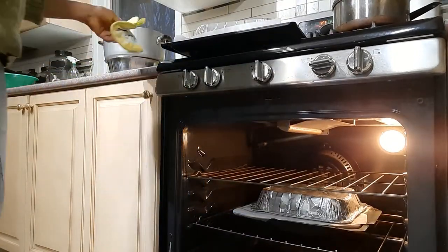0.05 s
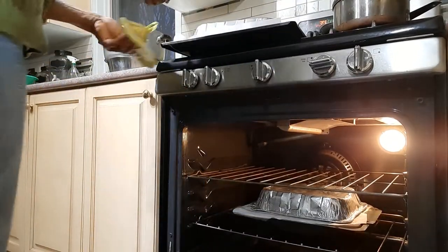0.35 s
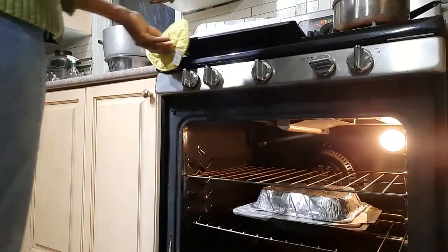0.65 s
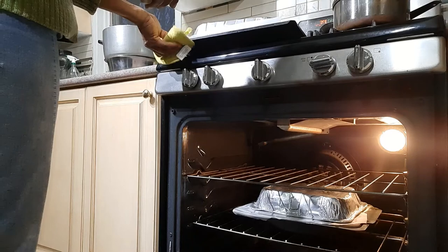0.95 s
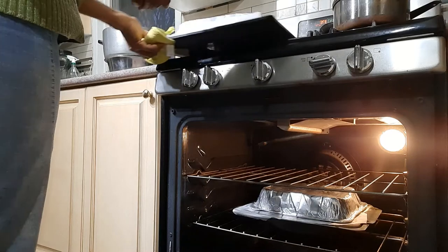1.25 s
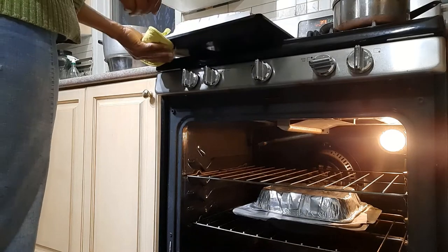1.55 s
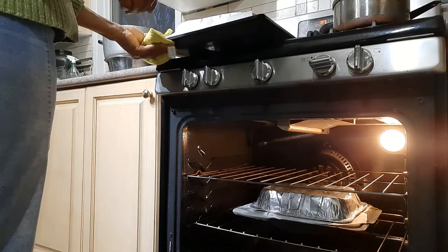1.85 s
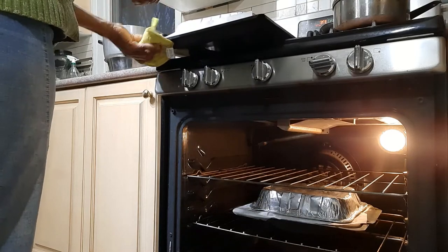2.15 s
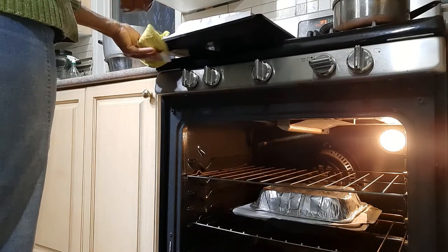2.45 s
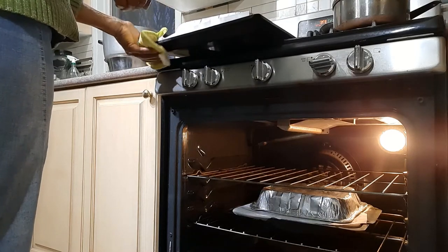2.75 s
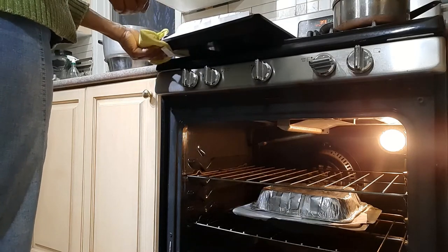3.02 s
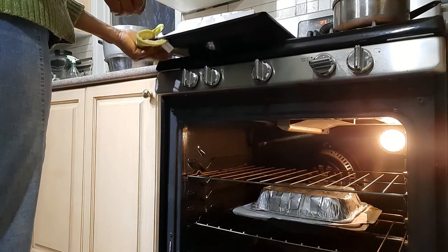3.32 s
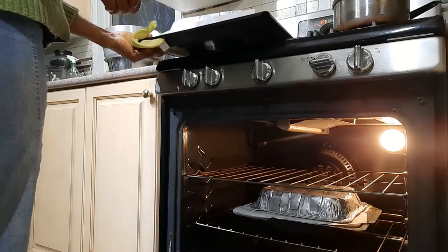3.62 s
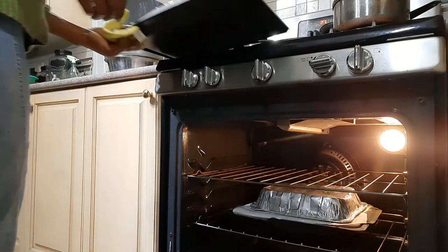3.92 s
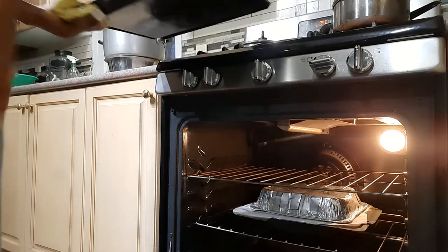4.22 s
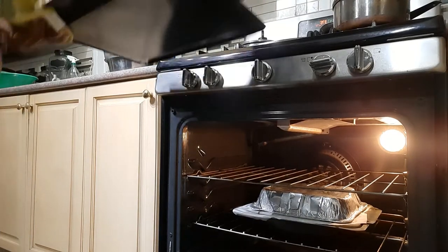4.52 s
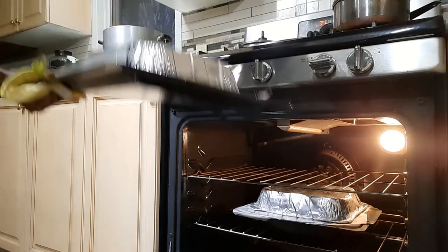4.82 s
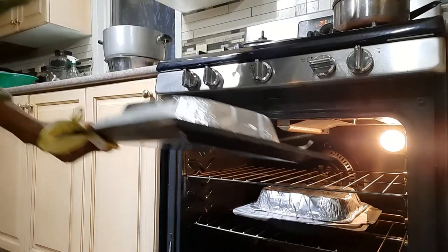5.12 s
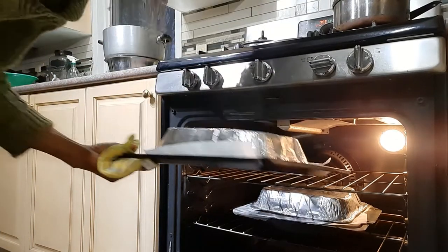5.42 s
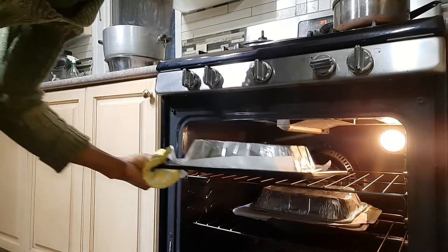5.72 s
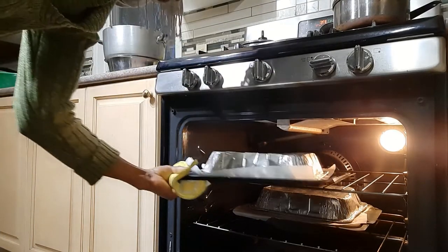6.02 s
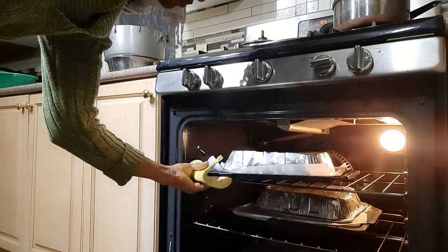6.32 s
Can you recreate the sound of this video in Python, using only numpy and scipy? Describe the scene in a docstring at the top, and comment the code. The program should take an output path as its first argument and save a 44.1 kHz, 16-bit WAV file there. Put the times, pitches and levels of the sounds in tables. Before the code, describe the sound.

A metal baking tray scrapes and clatters onto a wire oven rack near the end, ringing in short jerks while the oven's steel body booms. Everything before is much quieter: swishing clothes, a short drag across the stove top, a few sharp foil crinkles and light metallic taps as the tray is lifted. The sounds are nearby, in stereo, with the short echo of a small kitchen over a low steady hum.

```python
"""A baking tray lands on a wire oven rack, grinds inward by stick-slip and knocks home, steel ringing.
The juddering rack makes the oven's steel box boom. Before that, a hand in a cloth mitt drags the tray
across the stove top and lifts it off, its foil pan crinkling. Clothes rustle as the cook shifts and
bends in a small, hard kitchen, over a low steady hum."""
import sys
import numpy as np
from scipy import signal
from scipy.fft import rfft, irfft, next_fast_len
from scipy.io import wavfile
from scipy.ndimage import uniform_filter1d

SR = 44100
rng = np.random.default_rng(int(sys.argv[2]) if len(sys.argv) > 2 else 0)


def file_out(sig):
    """Save sig as 16-bit WAV at sys.argv[1]."""
    # one column per channel
    cols = np.atleast_2d(sig).T
    # limit, then scale
    lim = np.clip(cols, -1, 1)
    pcm = np.round(lim * 32767).astype(np.int16)
    wavfile.write(sys.argv[1], SR, pcm)


N = 289869

# tray slides along the rack wires: start_s, hold_s, friction_db, boom_db
RACK_SLIDES = [(5.836, 0.0069, -22.5, -29), (5.877, 0.027, -29.5, -38), (5.897, 0.051, -20.5, -29),
               (5.984, 0.027, -28, -43), (6.051, 0.038, -38, -36.5), (6.126, 0.057, -43.5, -39),
               (6.164, 0.026, -36.5, -38), (6.197, 0.059, -42, -34), (6.297, 0.0053, -50, -27),
               (6.39, 0.022, -42.5, -44.5), (6.463, 0.034, -60, -47.5)]
# source placement: freq_hz, left_minus_right_db
OVEN_PAN = [(200, 0), (400, -1), (700, 6.5), (1300, 0), (2400, 2), (4400, -2), (8000, -6), (13000, -5)]
STOVE_PAN = [(200, 4.5), (380, -3.5), (700, 6), (1300, 1.5), (4400, 0.5), (8000, -7), (15000, -5.5)]
COOK_PAN = [(380, 1), (700, 3), (1300, 2.5), (4400, 2), (8000, -4), (15000, -3.5)]


def amp(db):
    return 10 ** (np.asarray(db) / 20)


def unit(x):
    """x at rms 1."""
    return x / np.sqrt(np.mean(x ** 2) + 1e-20)


def along(points, hz):
    """(freq_hz, value) points read on a log axis."""
    freq_hz, values = np.transpose(points)
    return np.interp(np.log(hz + 1), np.log(freq_hz + 1), values)


def filtered(x, response):
    """x with its spectrum scaled by response(hz)."""
    n = x.shape[-1]
    n_fft = next_fast_len(n + 8192)
    return irfft(rfft(x, n_fft) * response(np.fft.rfftfreq(n_fft, 1 / SR)), n_fft)[..., :n]


def noise(colour, pan, size, tilt_db_oct=0):
    """Coloured stereo noise of rms 1, channels alike in the bass only."""
    # left-right likeness: freq_hz, correlation
    coherence = [(60, .96), (140, .97), (300, .8), (640, .35), (1400, .13), (6000, 0)]

    def mid_side_gains(hz):
        angle = np.arccos(np.clip(along(coherence, hz), -1, 1)) / 2
        gain = amp(along(colour, hz) + tilt_db_oct * np.log2(np.maximum(hz, 200)))
        return gain * [np.cos(angle), np.sin(angle)]

    mid, side = filtered(rng.standard_normal((2, size)), mid_side_gains)
    stereo = np.array([mid + side, mid - side])
    return unit(filtered(stereo, lambda hz: amp(np.outer([.5, -.5], along(pan, hz)))))


def burst(colour, pan, tilt_db_oct=0, direct=0.096, direct_s=0.0083):
    """One contact in the room: a crack, then reflections whose treble dies first."""
    # kitchen reverberation: freq_hz, t60_s
    room_decay = [(150, 0.7), (700, 0.45), (2000, 0.29), (5000, 0.25), (14000, 0.28)]
    size = SR // 2
    hz, frame_s, spectra = signal.stft(noise(colour, pan, size, tilt_db_oct), SR, nperseg=256)
    decay = amp(-60 * frame_s / along(room_decay, hz)[:, None])
    tail = signal.istft(spectra * decay, SR, nperseg=256)[1][:, :size]
    return tail * (1 + direct * np.exp(-np.arange(size) / SR / direct_s))


def clang(modes, colour, pan, tilt_db_oct, ring_db, rise_s=0.00059):
    """Metal contact: modes ring at random strengths over a dense burst."""
    t = np.arange(SR // 2) / SR
    hz, level_db, t60_s = np.transpose(modes)[:, :, None]
    strength = amp(level_db + 2 * rng.standard_normal(hz.shape))
    phase = rng.uniform(0, 2 * np.pi, (2, len(modes), 1))
    balance = amp(np.array([.5, -.5])[:, None, None] * along(pan, hz))
    partials = balance * strength * amp(-60 * t / t60_s) * np.sin(2 * np.pi * hz * t + phase)
    ring = partials.sum(axis=1) / np.linalg.norm(strength)
    attack = 1 - np.exp(-(t / (rise_s * 2 ** (-tilt_db_oct / 2))) ** 2)  # dull contacts are slow
    ring_gain = amp(ring_db - 2 * abs(tilt_db_oct))  # glancing or soft contacts hardly ring
    return attack * (burst(colour, pan, tilt_db_oct) + ring_gain * ring)


def slips(rate_hz, spread_db):
    """Random stick-slip impulses of uneven size, rms 1."""
    impulses = (rng.random(N) < rate_hz / SR) * rng.choice([-1, 1], N)
    return unit(impulses * amp(spread_db * np.clip(rng.standard_normal(N), -2, 2)))


def excite(drive, response):
    """Drive convolved with a stereo response scaled to unit energy."""
    return signal.fftconvolve(drive[None], unit(response) / np.sqrt(response.shape[1]), axes=1)[:, :N]


def friction(colour, pan, rate_hz, spread_db, linger_s=0.0075, body_db=-1):
    """Grainy rubbing, rms 1: each slip puffs noise and excites nearby resonances."""
    t = np.arange(SR // 8) / SR
    drive = slips(rate_hz, spread_db)
    energy = signal.fftconvolve(drive ** 2, 4 * np.exp(-t / .001) + np.exp(-t / linger_s))[:N]
    puffs = unit(np.sqrt(np.abs(energy)) * noise(colour, pan, N))
    return unit(puffs + amp(body_db) * excite(drive, burst(colour, pan, direct=0)))


def strikes(rows, sound):
    """A fresh sound(tilt_db_oct) for each row."""
    track = np.zeros((2, N + SR))
    for start_s, level_db, tilt_db_oct in rows:
        track[:, round(start_s * SR):][:, :SR // 2] += amp(level_db) * sound(tilt_db_oct)
    return track[:, :N]


def swell(start, hold_s, attack_s, release_s, bend):
    """Gain: 1 from start (s) for hold_s, -20 dB attack_s before and release_s after; bend curves it."""
    first = max(0, int((start - 4 * attack_s) * SR))
    last = min(N, int((start + hold_s + 4 * release_s) * SR))
    t = np.arange(first, last) / SR - start
    away = np.maximum(-t / attack_s, 0) + np.maximum((t - hold_s) / release_s, 0)
    gain = np.zeros(N)
    gain[first:last] = amp(-20 * away ** bend)
    return gain


def swells(starts_s, holds_s, levels_db, attack_s, release_s, bend):
    """Swells of one shape, added in power."""
    return np.sqrt(sum((amp(level_db) * swell(start_s, hold_s, attack_s, release_s, bend)) ** 2
                       for start_s, hold_s, level_db in zip(starts_s, holds_s, levels_db)))


def room_tone(hollow_db=-75, hum_db=-73, hiss_db=-77):
    """Low hum, faint hiss and a hollow noise that swells as the cook shifts about."""
    # cook's shuffles: start_s, hold_s, level_db
    shuffles = [(0, 0.11, -59.5), (0.182, .13, -65.5), (0.534, 0.11, -66.5), (0.794, 0.07, -66),
                (1.87, 0.19, -71), (2.613, 0.056, -66.5), (2.781, 0.045, -62.5), (2.933, 0.21, -70),
                (3.51, 0.36, -68.5), (3.985, 0.33, -71.5), (4.484, 0.026, -60), (5.127, 0.028, -68),
                (5.538, 0.051, -66), (5.716, .1, -74)]
    # spectra: freq_hz, level_db
    hollow_colour = [(40, -25), (130, -13.5), (225, -17.5), (285, -9), (320, 1), (365, -9), (470, -17),
                     (780, -17), (1100, -25.5), (2500, -42), (5000, -72)]
    hum_colour = [(25, -31), (50, -6.5), (78, 2.5), (135, -2.5), (185, -2), (230, -11), (320, -19),
                  (470, -7.5), (750, -15), (1200, -22.5), (3000, -67)]
    hiss_colour = [(60, -15), (300, 1.5), (1000, -5.5), (2500, -4.5), (15000, -4)]
    centre = [(1000, 0)]
    shifts = swells(*np.transpose(shuffles), attack_s=.09, release_s=0.23, bend=0.83)
    hollow = np.hypot(amp(hollow_db), shifts) * noise(hollow_colour, centre, N)
    hiss = amp(hiss_db) * noise(hiss_colour, centre, N)
    return amp(hum_db) * noise(hum_colour, centre, N) + hollow + hiss


def cloth():
    """Mitt and clothes: fibres hiss, the pressed weave rubs lower."""
    # cloth strokes: start_s, hold_s, swish_db, rub_db
    strokes = [(.01, 0.038, -65, -64.5), (0.12, .08, -78, -92), (0.287, 0.051, -67, -66.5),
               (0.417, 0.21, -76, -71.5), (0.665, .05, -61, -61.5), (0.776, 0.022, -58.5, -58),
               (0.883, 0.059, -60, -62.5), (1.515, 0.06, -63, -72.5), (1.645, 0.031, -63.5, -64.5),
               (1.746, 0.04, -52.5, -60.5), (1.852, 0.25, -72, -71.5), (2.12, 0.17, -74.5, -78),
               (2.352, 0.11, -68, -76.5), (2.471, .015, -64, -68.5), (2.641, 0.027, -61.5, -68.5),
               (2.7, 0.068, -67, -69.5), (2.89, 0.19, -67, -75), (3.144, 0.093, -63.5, -66),
               (3.61, 0.025, -66, -67), (4.039, 0.082, -68.5, -73), (4.24, 0.095, -61.5, -72.5),
               (4.448, 0.23, -57.5, -71), (4.708, 0.18, -55.5, -67.5), (5.0, 0.23, -78.5, -82),
               (5.554, 0.057, -98, -84.5), (6.423, 0.049, -48.5, -65.5)]
    # spectra: freq_hz, level_db
    swish_colour = [(200, -50), (1200, -15), (3000, 1), (4500, 2), (7000, 1), (9000, -2.5), (12500, 1),
                    (15500, -0.5)]
    rub_colour = [(40, -45), (200, -54), (450, -0.5), (800, 6), (1150, 2), (2200, 0), (4000, -13),
                  (9000, -58)]
    start_s, hold_s, swish_db, rub_db = np.transpose(strokes)
    swish = swells(start_s, hold_s, swish_db, attack_s=0.13, release_s=0.12, bend=0.9)
    rub = swells(start_s, hold_s, rub_db, attack_s=0.14, release_s=0.22, bend=0.75)
    fibres = swish * friction(swish_colour, COOK_PAN, rate_hz=4000, spread_db=3.0)
    weave = rub * friction(rub_colour, COOK_PAN, rate_hz=230, spread_db=1)
    return fibres + weave


def foil_pan(gain_db=-1):
    """The foil pan crinkles in sharp cracks."""
    # crinkles: start_s, level_db, tilt_db_oct
    crinkles = [(1.467, -60, -4), (1.635, -51, 11), (1.647, -53, 12), (1.749, -50, -1), (1.916, -58.5, -3),
                (2.006, -42.5, 8.5), (2.014, -46, -2), (2.336, -64.5, 9), (4.328, -50.5, 12)]
    # foil spectrum: freq_hz, level_db
    colour = [(60, -50), (200, -46), (450, -11), (800, -4.5), (1700, -15), (3100, 0.5), (6200, -2.5),
              (8500, -7), (11800, -4), (15500, -12)]
    crack = lambda tilt: burst(colour, COOK_PAN, tilt, direct=0.2, direct_s=0.00047)
    return amp(gain_db) * strikes(crinkles, crack)


def stove_bumps(rise_s=0.0019):
    """Padded bumps on the stove body: force builds slowly, so nothing cracks or rings."""
    # bumps: start_s, level_db, tilt_db_oct
    bumps = [(3.379, -53, 8.5), (3.412, -59.5, 1), (3.545, -62.5, -6), (3.8, -74, 8)]
    # thud spectrum: freq_hz, level_db
    colour = [(35, -26), (100, 9), (300, 11), (480, 7), (750, 2), (1200, -6), (2200, -17.5), (3200, -38.5),
              (6000, -46), (12000, -65)]
    t = np.arange(SR // 2) / SR
    attack = 1 - np.exp(-(t / rise_s) ** 2)
    return strikes(bumps, lambda tilt: attack * burst(colour, STOVE_PAN, tilt))


def tray_on_stove(drag_db=-44, tap_gain_db=-1):
    """The tray drags over the stove top, taps it and slides ringing off its edge."""
    # one pull, speeding up then slowing: start (s), hold_s, attack_s, release_s, bend
    pull = dict(start=1.163, hold_s=0.049, attack_s=0.095, release_s=0.22, bend=1.98)
    # pulls off the edge: start_s, hold_s, level_db
    edge_pulls = [(3.655, .06, -55), (3.8, .015, -49)]
    # light taps: start_s, level_db, tilt_db_oct
    tap_hits = [(.868, -69, 9), (1.116, -69, -17), (1.222, -64, -14), (3.192, -73, 4), (3.53, -58.5, -5),
                (3.671, -53.5, -2), (3.728, -48.5, -3.5), (3.764, -47.5, 0), (3.805, -50, 2.5)]
    # rim ringing on the stove: pitch_hz, level_db, t60_s
    rim_modes = [(791, 11, 0.2), (870, -2, .25), (874, -9, 0.33), (1020, -8, 0.18), (1076, -22, .2),
                 (1510, 6, 0.15)]
    # spectra: freq_hz, level_db
    stove_colour = [(40, -49), (110, -8.5), (235, -10), (290, 2.5), (325, 8), (390, -7.5), (490, 5.5),
                    (650, -1), (950, -1), (1500, 0), (3000, -9), (5900, -12), (9000, -21.5), (12500, -17),
                    (15500, -9)]
    rim_colour = [(40, -33), (130, -24), (400, -38), (530, -8), (650, -19.5), (810, -3.5), (1050, -8),
                  (1250, -11), (1500, -13), (2300, -15.5), (4500, -21), (9500, -36), (13000, -33.5),
                  (15500, -35)]
    scrape = friction(stove_colour, STOVE_PAN, rate_hz=660, spread_db=2.5, body_db=3.0)
    drag = amp(drag_db) * swell(**pull) * scrape
    catches = slips(rate_hz=540, spread_db=5)
    rim = clang(rim_modes, rim_colour, STOVE_PAN, tilt_db_oct=1.0, ring_db=-6)
    lift = swells(*np.transpose(edge_pulls), attack_s=0.14, release_s=0.07, bend=0.62)
    taps = strikes(tap_hits, lambda tilt: clang(rim_modes, rim_colour, STOVE_PAN, tilt, ring_db=8.5))
    return drag + lift * unit(excite(catches, rim)) + amp(tap_gain_db) * taps


def oven_box(build_up_s=0.021):
    """The juddering rack drives the low resonances of the oven's panels and cavity."""
    # box resonances: pitch_hz, width_hz, level_db
    box_modes = [(80, 20, -15), (124, 12, 1), (162, 11, 2), (240, 30, -13), (290, 25, -10), (323, 18, -3),
                 (356, 25, -8)]

    def response(hz):
        return sum((-1) ** k * amp(level_db) * 1j * hz * width_hz
                   / (pitch_hz ** 2 - hz ** 2 + 1j * hz * width_hz)
                   for k, (pitch_hz, width_hz, level_db) in enumerate(box_modes))

    judder = noise([(40, -14), (95, 0), (400, 0), (900, -20)], OVEN_PAN, N)
    boom = filtered(judder, response)
    # the boom is evened to a steady level, so the shake swells alone set its loudness
    energy = np.abs(uniform_filter1d(np.mean(boom ** 2, axis=0), size=SR // 16))
    start_s, hold_s, _, boom_db = np.transpose(RACK_SLIDES)
    shake = swells(start_s + build_up_s, hold_s, boom_db, attack_s=0.0068, release_s=0.084, bend=1.27)
    return shake * boom / np.sqrt(energy + 1e-20)


def tray_on_rack(knock_gain_db=-2, rasp_gain_db=-6.5):
    """The tray sticks and slips along the wires and knocks over them; finer slips add a bright rasp."""
    # knocks on the rack: start_s, level_db, tilt_db_oct
    knock_hits = [(5.832, -31, 3.5), (5.835, -20.5, 7.5), (5.842, -21, 0.5), (5.904, -28, 2),
                  (5.937, -16.5, 0.5), (5.961, -23.5, 2), (6.014, -29.5, -3.5), (6.066, -28, -2),
                  (6.172, -26.5, 3), (6.191, -30, -2.5), (6.304, -21.5, 0.5), (6.309, -32.5, 1),
                  (6.318, -29.5, -10.5), (6.479, -38, 1)]
    # tray and rack ringing: pitch_hz, level_db, t60_s
    steel_modes = [(728, 1, .45), (802, 1, .55), (977, -4, .55), (1232, -1, .5), (1366, -3, .45),
                   (1394, -4, .4), (1430, -5, .45), (1514, -4, .4), (1577, -5, .3), (1755, 1, .45),
                   (1781, -3, .45), (1830, -6, .45), (1997, -2, .5), (2094, -3, .45), (2223, -3, .45),
                   (2336, -5, .4), (2455, 0, .35), (2595, -1, .4), (2729, -1, .4), (2860, -3, .4),
                   (3068, -6, .35), (3311, -4, .3), (3833, -6, .3), (4208, -3, .3), (4522, -7, .3)]
    # steel contact spectrum: freq_hz, level_db
    colour = [(30, -50), (65, -17), (140, -20.5), (330, 1.5), (490, -7.5), (720, -2.5), (1000, -1),
              (1450, 0.5), (2400, -1.5), (3600, -5.5), (6900, -11.5), (9500, -19.5), (13000, -16.5),
              (15500, -21.5)]
    start_s, hold_s, friction_db, _ = np.transpose(RACK_SLIDES)
    force = swells(start_s, hold_s, friction_db, attack_s=0.0049, release_s=.035, bend=1.05)
    coarse_slips = force * slips(rate_hz=500, spread_db=7.5)
    grind = excite(coarse_slips, clang(steel_modes, colour, OVEN_PAN, tilt_db_oct=0, ring_db=-5.0))
    fine_slips = force * slips(rate_hz=2200, spread_db=9)
    rasp = excite(fine_slips, burst(colour, OVEN_PAN, tilt_db_oct=3.0))
    knocks = strikes(knock_hits, lambda tilt: clang(steel_modes, colour, OVEN_PAN, tilt, ring_db=-7.0))
    return grind + amp(rasp_gain_db) * rasp + amp(knock_gain_db) * knocks


def scene():
    """Stereo sum of all sources."""
    handling = cloth() + tray_on_stove() + stove_bumps() + foil_pan()
    return handling + tray_on_rack() + oven_box() + room_tone()


def record(dry):
    """Steep low-pass."""
    top_hz, edge_hz = 15900, 300
    return filtered(dry, lambda hz: np.clip((top_hz - hz) / edge_hz + .5, 0, 1) ** 2)


dry = scene()
out = record(dry)
file_out(out)
```